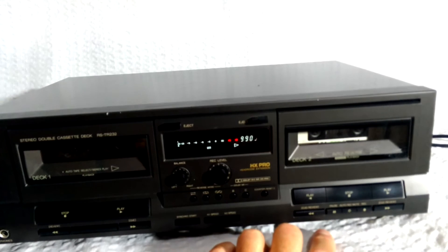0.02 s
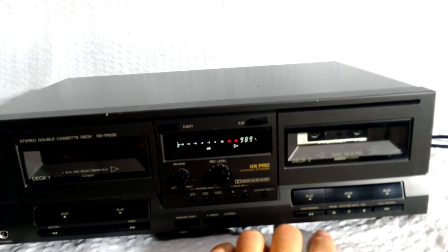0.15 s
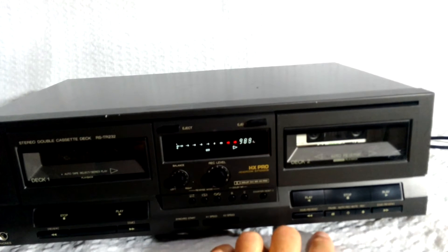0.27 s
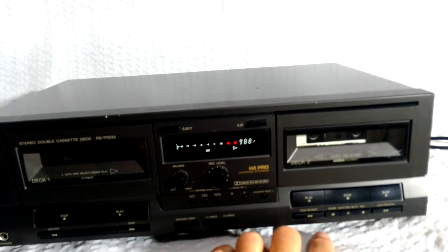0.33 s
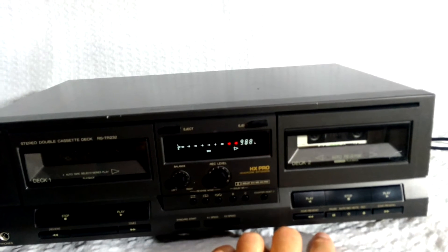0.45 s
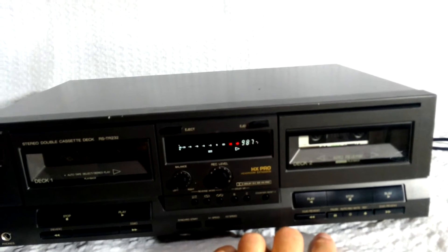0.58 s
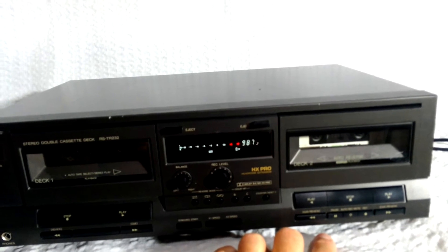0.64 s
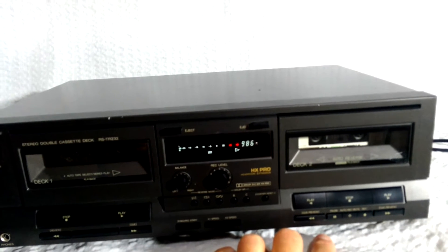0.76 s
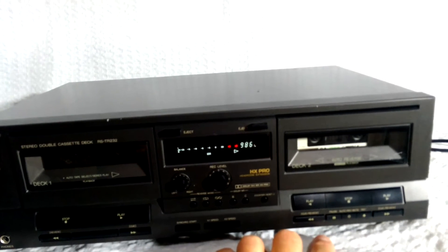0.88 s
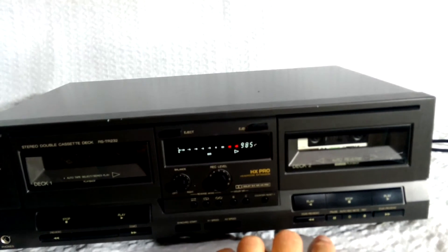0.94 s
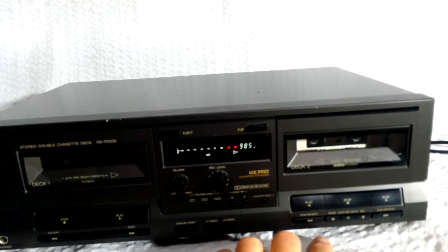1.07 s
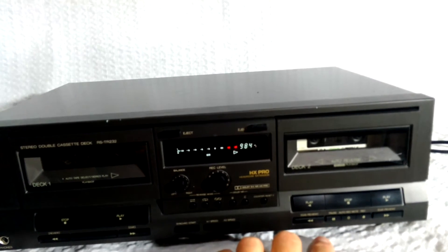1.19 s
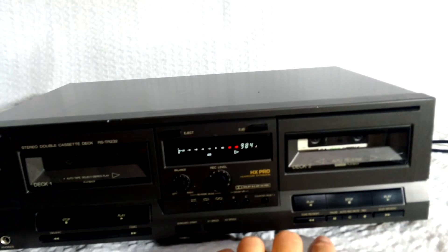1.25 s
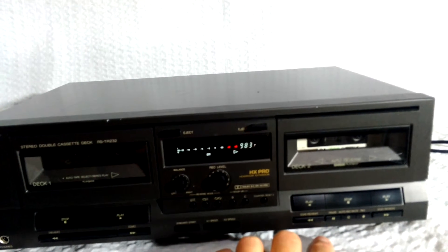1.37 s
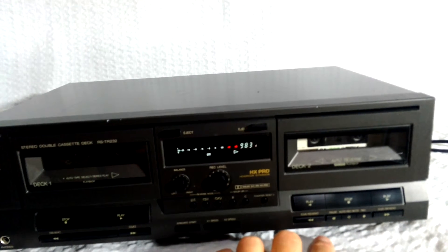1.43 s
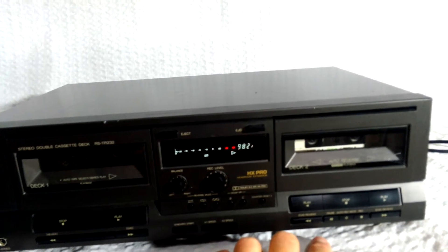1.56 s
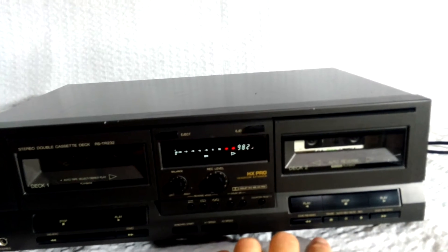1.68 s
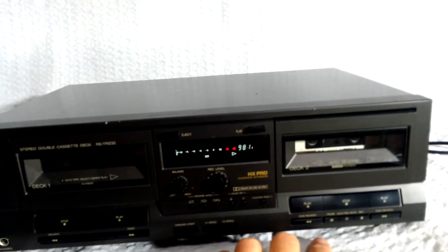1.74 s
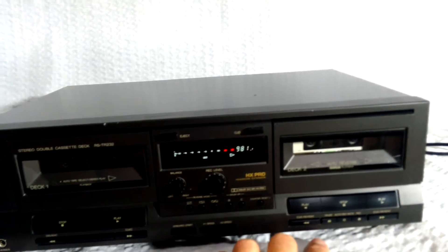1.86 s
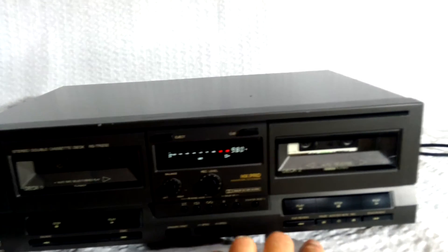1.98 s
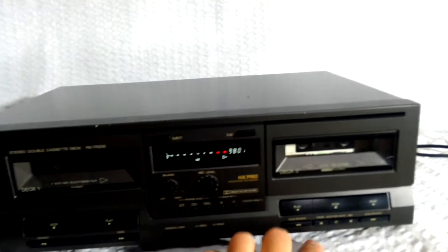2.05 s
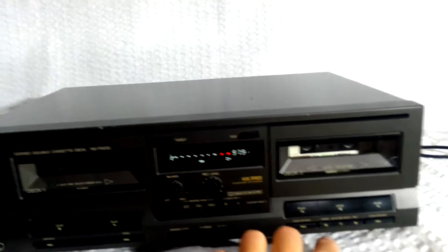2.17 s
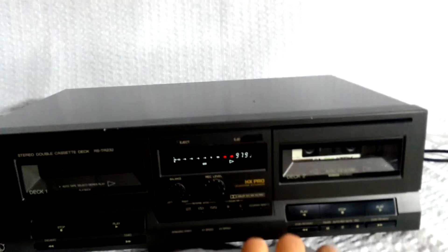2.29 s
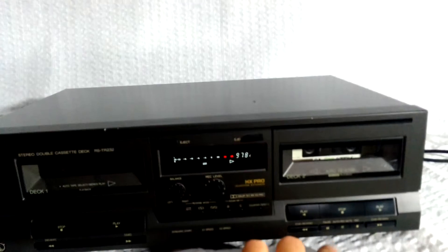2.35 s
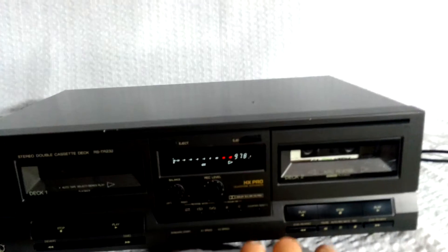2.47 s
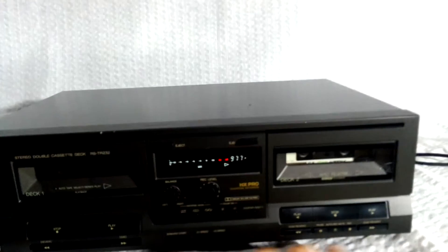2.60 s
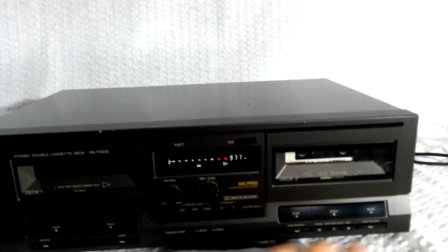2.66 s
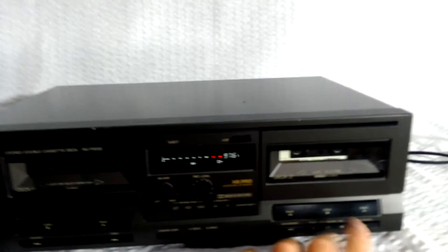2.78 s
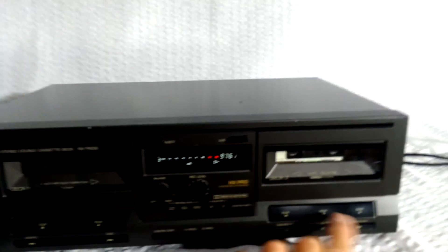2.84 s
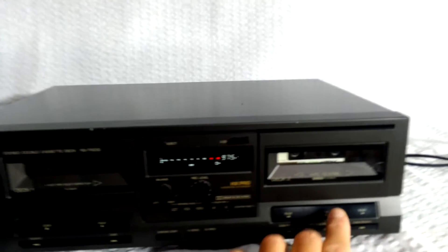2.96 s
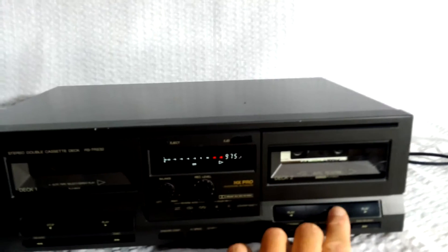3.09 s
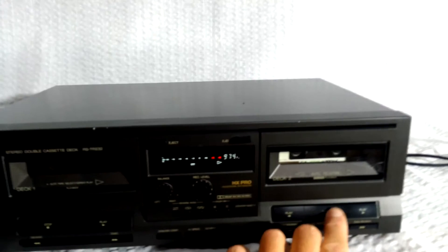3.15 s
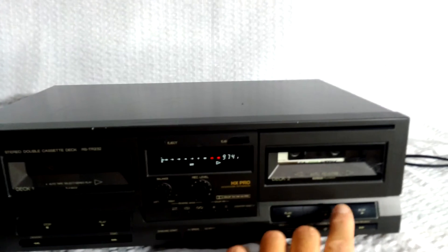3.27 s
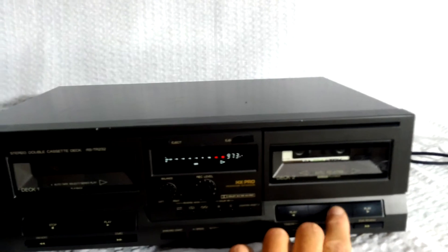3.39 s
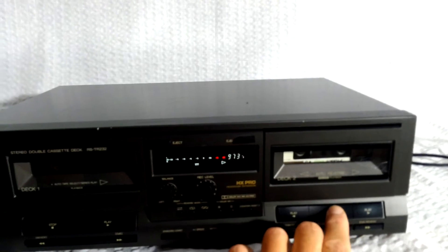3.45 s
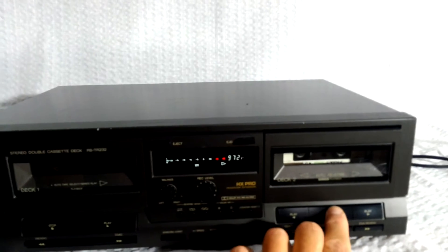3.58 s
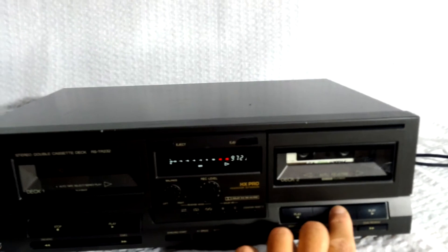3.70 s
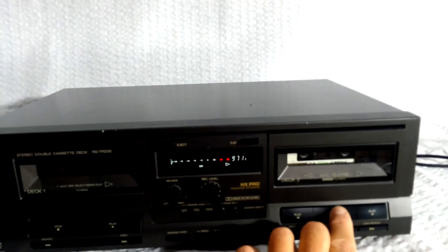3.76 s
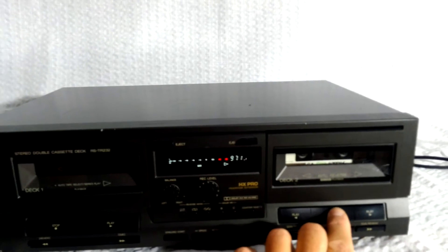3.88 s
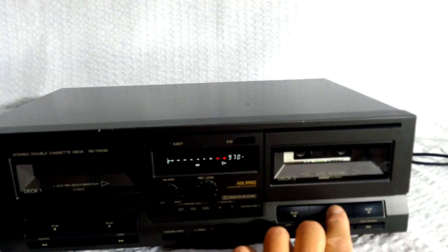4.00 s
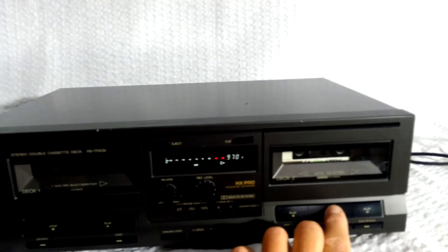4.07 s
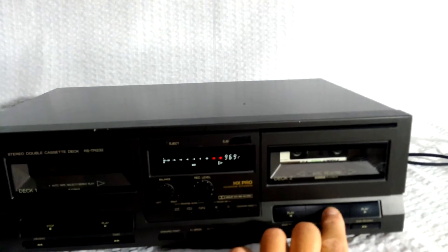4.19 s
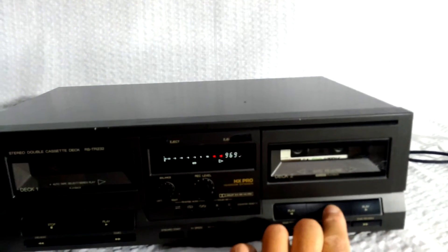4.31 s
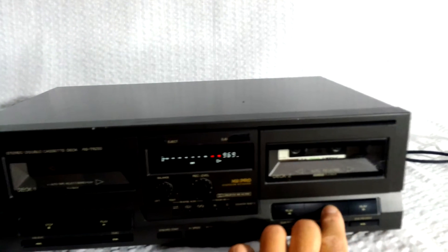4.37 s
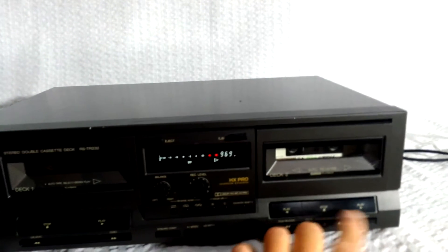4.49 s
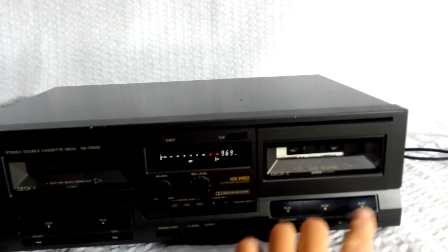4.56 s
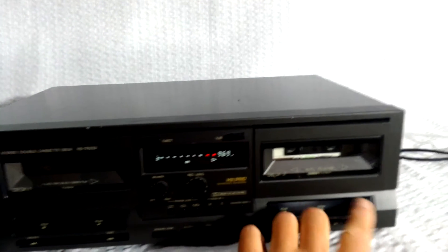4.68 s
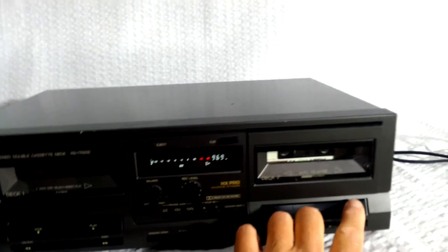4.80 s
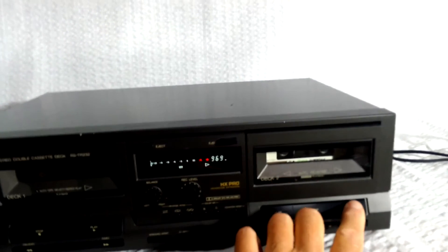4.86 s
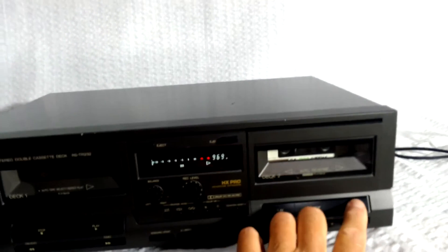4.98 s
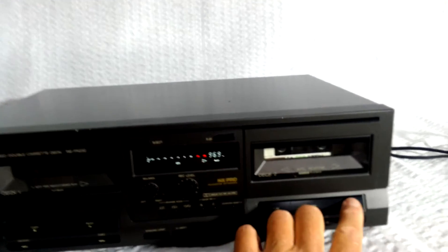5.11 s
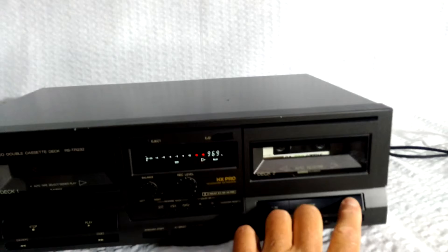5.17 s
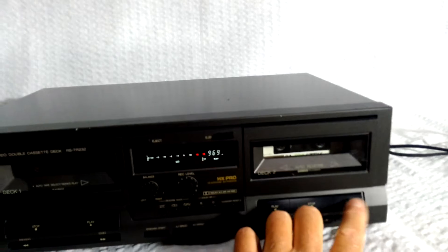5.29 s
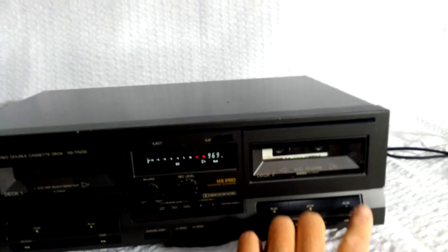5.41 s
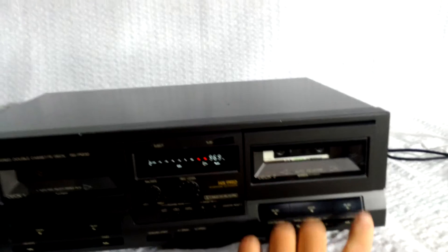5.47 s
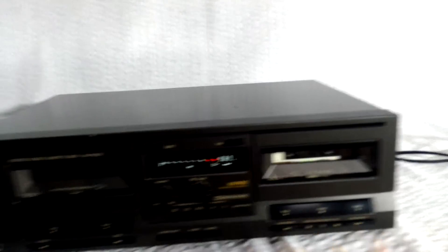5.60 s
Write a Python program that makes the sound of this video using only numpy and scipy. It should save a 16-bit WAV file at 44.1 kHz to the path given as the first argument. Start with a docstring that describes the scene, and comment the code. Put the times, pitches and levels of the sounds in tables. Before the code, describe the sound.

A cassette deck rewinds with a whirring motor and rapid rhythmic reel knocks, then stops with a ringing clunk and several key clicks.

```python
"""Cassette deck rewinding, stopped by its keys

A motor whirs as tones and coloured noise; an off-centre reel scrapes (resonated grit) and knocks once a turn.
A key clicks, the transport drops out with a clunk that rings the chassis (decaying modes), more clicks follow.
Close by in a small room with mains hum. The small microphone has a sharp treble resonance, and its
electronics add a faint whine, hiss and sizzle."""
import sys
import numpy as np
from scipy import signal
from scipy.fft import rfft, irfft
from scipy.io import wavfile

SR = 44100
rng = np.random.default_rng(int(sys.argv[2]) if len(sys.argv) > 2 else 0)


def store_wav(level_fs):
    """Save 16-bit WAV to argv[1]."""
    pcm = np.round(np.clip(np.atleast_2d(level_fs), -1, 1) * 32767)
    wavfile.write(sys.argv[1], SR, pcm.T.astype(np.int16))


N = 248724
T = np.arange(N) / SR
TURN_S = 0.13258  # one turn of the reel


def undb(db):
    """Decibels to gain."""
    return 10 ** (np.asarray(db) / 20)


def level(x, db=0):
    """Set the rms level in dB."""
    return x * undb(db) / np.sqrt(np.mean(x ** 2))


def response(points, size):
    """Gain per FFT bin of (Hz, dB) points joined on a log-frequency axis."""
    hz, db = np.transpose(points)
    bins_hz = np.fft.rfftfreq(size, 1 / SR)
    return undb(np.interp(np.log(bins_hz + 1), np.log(hz), db))


def noise(points):
    """Gaussian noise of the given colour, rms 1."""
    spectrum = rfft(rng.standard_normal(N)) * response(points, N)
    return level(irfft(spectrum, N))


def resonate(x, peaks):
    """Pass a sound through parallel (Hz, width Hz, dB) resonances."""
    out = np.zeros(N)
    for hz, width_hz, db in peaks:
        b, a = signal.iirpeak(hz, hz / width_hz, fs=SR)
        out += undb(db) * signal.lfilter(b, a, x)
    return out


def walk(rate_hz):
    """Random wander joining rate_hz knots a second, spread near 1."""
    knots = rng.standard_normal(N // 20)
    return np.interp(T * rate_hz, np.arange(len(knots)), knots)


def tones(lines, waver_hz):
    """Steady (Hz, dB rms) tones, each wandering a little in pitch."""
    out = np.zeros(N)
    for hz, db in lines:
        cycles = np.cumsum(hz + waver_hz * walk(10)) / SR + rng.random()
        out += np.sqrt(2) * undb(db) * np.sin(2 * np.pi * cycles)
    return out


def fade(age_s, t60_s):
    """Exponential decay by 60 dB in t60_s, silent before its start."""
    return (age_s >= 0) * np.exp(-np.log(1000) * np.abs(age_s) / t60_s)


def ping(age_s, hz, rise_s):
    """A tone whose envelope swells to 1 at rise_s and dies away."""
    u = np.clip(age_s / rise_s, 0, 20)
    return (u * np.exp(1 - u)) ** 2 * np.sin(2 * np.pi * hz * age_s)


def sizzle(hz, swing_hz, jitter_hz, db):
    """A thin electrical tone that flares and bends once every mains cycle."""
    mains = 2 * np.pi * 60 * T
    pitch_hz = hz + swing_hz * np.cos(mains) + jitter_hz * walk(900)
    flare = undb(8 * np.sin(mains))
    return level(flare * np.sin(2 * np.pi * np.cumsum(pitch_hz) / SR), db)


def electronics():
    """Self-noise of the microphone electronics: wavering whine tones, coloured hiss and sizzle."""
    # Each row: frequency in Hz, rms level in dB.
    whine_lines = [(5517.5, -59), (8275.5, -69.5), (11034, -70), (13792, -95)]
    # Hiss colour. Each row: frequency in Hz, relative density in dB per Hz.
    hiss_colour = [(1000, -25), (4800, -24), (5800, -10.5), (7000, -17), (9800, -17), (11000, -9),
                   (11650, -11), (12400, -5.5), (13200, -11), (15500, -19.5)]
    whine = tones(whine_lines, waver_hz=2.47)
    hiss = level(noise(hiss_colour), -64.0)
    return whine + hiss + sizzle(hz=12390, swing_hz=60, jitter_hz=91, db=-65.0)


def room():
    """Still-room noise, mains hum and the tones of the idling capstan drive."""
    # Still room. Each row: frequency in Hz, relative density in dB per Hz.
    room_colour = [(25, -34), (48, -7), (75, 1.5), (90, -3), (170, 2.5), (270, 3.5), (450, -2), (800, -5.5),
                   (1500, -12), (3000, -18.5), (5500, -15.5), (15500, -24)]
    # Mains and capstan drive. Each row: frequency in Hz, rms level in dB.
    hum_lines = [(100, -80.5), (120, -65), (139, -73), (300.5, -76), (356.5, -71.5)]
    air = noise(room_colour) * undb(-64.5 + 0.26 * walk(5.1))
    return air + tones(hum_lines, waver_hz=0.54)


def blows(table, colour, t60_s, tail_db, tail_t60_s, bright_tail_db, bright_tail_t60_s,
          ring_db, lowest_hz, rattle_wander_db):
    """Each blow bursts in body and rattle noise, rings the chassis modes and leaves a tail in the room."""
    # Chassis modes. Each row: frequency in Hz, relative level in dB, t60 in seconds.
    chassis_modes = [(322, -15, 0.48), (740, -14.5, 0.29), (1132, -4.5, 0.12), (1601, -1, 0.12),
                     (2100, -11, .18), (2205, -4, 0.071), (2720, -3, 0.062), (2950, -4, 0.052),
                     (3680, -23, .12), (4600, -2, 0.075), (4460, -1.5, 0.074), (5700, -13, 0.16),
                     (5830, -24, .2), (6101, -33, 0.18), (6940, -12, 0.12)]
    # Small parts rattling. Each row: frequency in Hz, relative density in dB per Hz.
    rattle_colour = [(2500, -27), (4200, -5), (5200, -3.5), (5800, 4), (6800, -2), (8000, -2), (11000, -5),
                     (15500, -11)]
    body_power, bright_power, strikes = np.zeros((3, N))
    for start_s, body_db, bright_db in table:
        age_s = T - start_s
        burst = fade(age_s, t60_s) ** 2
        body_tail = (undb(tail_db) * fade(age_s, tail_t60_s)) ** 2
        bright_tail = (undb(bright_tail_db) * fade(age_s, bright_tail_t60_s)) ** 2
        body_power += undb(body_db) ** 2 * (burst + body_tail)
        bright_power += undb(bright_db) ** 2 * (burst + bright_tail)
        strikes[int(start_s * SR)] += undb(body_db)

    ring_time_s = T[:SR]
    chassis = np.zeros(SR)
    for hz, db, mode_t60_s in chassis_modes:
        envelope = undb(db + ring_db) * fade(ring_time_s, mode_t60_s)
        chassis += envelope * np.sin(2 * np.pi * hz * ring_time_s)
    b, a = signal.butter(2, lowest_hz, "high", fs=SR)
    chassis = signal.lfilter(b, a, chassis)  # light parts barely stir the low modes

    unevenness = undb(rattle_wander_db * walk(600))  # slight, and none at 0 dB
    body = np.sqrt(body_power) * noise(colour)
    rattle = np.sqrt(bright_power) * unevenness * noise(rattle_colour)
    return body + rattle + signal.fftconvolve(strikes, chassis)[:N]


def latches():
    """Latches and key springs ping as they seat: short swelling tones."""
    # Each row: start in seconds, frequency in Hz, envelope peak in dB, rise in seconds.
    seatings = [(4.343, 5770, -34.5, 0.00037), (4.401, 5750, -17.5, 0.0019), (4.4080, 5900, -20.5, 0.00097),
                (4.4095, 5680, -24, 0.0013), (5.4594, 5530, -20.5, 0.00032), (5.4775, 6000, -31, 0.00058),
                (5.5393, 5380, -14.5, 0.00095), (5.5403, 6600, -17, 0.00099)]
    return sum(undb(db) * ping(T - start_s, hz, rise_s) for start_s, hz, db, rise_s in seatings)


def key_clicks():
    """Keys clicked by a finger: light blows that stir the upper chassis modes."""
    # Each row: start in seconds, body level in dB, bright rattle level in dB.
    clicks = [(4.3433, -34, -38.5), (5.1095, -41, -44), (5.2840, -50.5, -64), (5.3360, -50.5, -52),
              (5.3550, -36.5, -32), (5.3605, -36.5, -32), (5.3885, -43, -42), (5.4195, -54, -42.5),
              (5.4595, -42.5, -33), (5.4775, -38.5, -34), (5.5402, -40, -23), (5.5455, -35.5, -36),
              (5.5660, -38.5, -30.5)]
    # Clack of the keys. Each row: frequency in Hz, relative density in dB per Hz.
    clack_colour = [(40, -34), (200, -3), (450, -13.5), (1050, -1), (1450, -3.5), (2000, -1.5),
                    (3700, -2.5), (5000, -5), (7500, -26), (15500, -28)]
    return blows(clicks, clack_colour, t60_s=0.055, tail_db=-13, tail_t60_s=0.34,
                 bright_tail_db=-18.0, bright_tail_t60_s=0.32,
                 ring_db=-8.5, lowest_hz=2180, rattle_wander_db=-0.5)


def transport_stop():
    """The transport drops out: a cluster of heavy blows that ring most of the chassis."""
    # Each row: start in seconds, body level in dB, bright rattle level in dB.
    drops = [(4.3895, -47, -37.5), (4.3932, -30.5, -25), (4.4007, -28.5, -26), (4.4040, -21, -20),
             (4.4085, -31.5, -29), (4.4370, -35, -35), (4.4540, -40, -36), (4.4635, -32.5, -38)]
    # Thud of the transport. Each row: frequency in Hz, relative density in dB per Hz.
    thud_colour = [(40, -45), (130, -18), (320, -1), (510, -16.5), (730, 5), (900, 0), (1170, 1.5),
                   (1400, -9.5), (1640, 2), (2300, -1.5), (3700, -2), (5000, -1.5), (7000, -7),
                   (15500, -36)]
    return blows(drops, thud_colour, t60_s=0.052, tail_db=-15.5, tail_t60_s=0.35,
                 bright_tail_db=-24, bright_tail_t60_s=0.27,
                 ring_db=-11.0, lowest_hz=255, rattle_wander_db=0.0)


def motor_whir():
    """Motor and belt: coloured noise of slightly unsteady level under wavering tones."""
    # Motor and belt noise. Each row: frequency in Hz, relative density in dB per Hz.
    whir_colour = [(100, -3), (200, -11.5), (370, 4), (500, -20), (750, 5), (1200, -17), (1450, -1),
                   (2200, -5), (3700, -2.5), (4600, 3.5), (5600, 1.5), (7000, -0.5), (10000, -2.5),
                   (15500, -0.5)]
    # Running motor. Each row: frequency in Hz, rms level in dB.
    motor_lines = [(211, -75.5), (234, -79.5), (377, -72.5)]
    whir = noise(whir_colour) * undb(-59.0 + 0.39 * walk(40))
    return whir + tones(motor_lines, waver_hz=2.49)


def shell_grit(repeat):
    """Roughness under the reel: the share repeat of its power comes round again with every turn."""
    same = np.resize(rng.standard_normal(int(TURN_S * SR)), N)
    fresh = rng.standard_normal(N) * undb(2.1 * rng.exponential(size=N))
    share = np.clip(repeat, 0, 1)
    return np.sqrt(share) * same + np.sqrt(1 - share) * level(fresh)


def reel_pressure(age_s):
    """Reel on shell: bites shortly before the knock, drags with sagging pressure, lets go to a light rub."""
    bite_lead_s, bite_attack_s, drag_s, let_go_s = 0.055, 0.012, 0.068, 0.023
    drag_sag_db_per_s, light_rub_db = 107, -13.5
    touch_s = (age_s + bite_lead_s) % TURN_S
    attack = np.clip(touch_s / bite_attack_s, 0, 1)
    release = np.clip(1 - (touch_s - drag_s) / let_go_s, 0, 1)
    return np.hypot(attack * release * undb(-drag_sag_db_per_s * touch_s), undb(light_rub_db))


def reel_scrape(age_s):
    """Grit under the reel's pressure excites the cassette shell; it eases slowly as the tape winds on."""
    # Shell resonances. Each row: frequency in Hz, width in Hz, relative level in dB.
    shell_peaks = [(728, 44, 2), (1205, 128, 7), (1654, 86, 2.5), (2214, 370, -6), (2840, 280, -3.5),
                   (3105, 110, -9.5), (4740, 196, -2), (6040, 310, -10)]
    scrape_db, ease_db_per_s = -59.5, 0.72
    pressure = reel_pressure(age_s) * undb(2.8 * walk(70))
    scrape = level(resonate(shell_grit(repeat=0.42) * pressure, shell_peaks))
    return scrape * undb(scrape_db - ease_db_per_s * T)


def reel_knocks(turn, age_s):
    """Once a turn the shell is knocked and rebounds, the hub knocks lower, and gritty short rings tick."""
    # Short rings set off by a knock. Each row: frequency in Hz, width in Hz, relative level in dB.
    tick_peaks = [(1160, 120, 1.5), (1700, 72, 1.5), (2580, 66, 0), (3390, 410, -10.5), (4570, 230, 2.5),
                  (5930, 230, -7.5)]
    # the shell knock grows steadily as the tape winds on
    shell_knock_db, shell_growth_db_per_s = -51, 1.3
    # the hub knock builds up quickly, then eases off
    hub_knock_db, hub_loudest_s, hub_build_db_per_s, hub_ease_db_per_s = -50.5, 0.46, 28, 3.5
    tick_below_knock_db = 22.5

    shell_db = shell_knock_db + shell_growth_db_per_s * T
    hub_build_db = hub_build_db_per_s * (hub_loudest_s - T)
    hub_ease_db = hub_ease_db_per_s * (T - hub_loudest_s)
    hub_db = hub_knock_db - np.maximum(hub_build_db, hub_ease_db)

    # no two knocks are alike
    shell_chance, pitch_chance, hub_chance = rng.standard_normal((turn[-1] + 1, 3))[turn].T
    shell = ping(age_s, hz=1230 * (1 + 0.014 * pitch_chance), rise_s=0.0034)
    rebound = undb(-14) * ping(age_s - 0.012, hz=1164, rise_s=0.0053)
    hub = ping(age_s, hz=735 * (1 + 0.015 * pitch_chance), rise_s=0.0066)
    shell_knock = undb(shell_db + 0.67 * shell_chance) * (shell + rebound)
    hub_knock = undb(hub_db + 0.79 * hub_chance) * hub

    tick_grit = shell_grit(repeat=0.4) * fade(age_s - 0.002, t60_s=0.074)
    tick = level(resonate(tick_grit, tick_peaks)) * undb(shell_db - tick_below_knock_db)
    return shell_knock + hub_knock + tick


def rewind():
    """The off-centre reel scrapes and knocks once a turn over the motor, until all fade out together."""
    first_knock_s, stop_s, fade_out_s = 0.0035, 4.395, 0.044
    turns = (T - first_knock_s) / TURN_S + 1
    age_s = turns % 1 * TURN_S  # since the latest knock
    running = np.clip((stop_s - T) / fade_out_s + 1, 0, 1)
    return (reel_knocks(turns.astype(int), age_s) + reel_scrape(age_s) + motor_whir()) * running


def scene():
    """The deck and the room, in mono."""
    return (room() + latches() + key_clicks() + transport_stop() + rewind())[None]


def microphone(x, size=2048):
    """Causal minimum-phase response with the port's resonance, which rings after every click."""
    # Each row: frequency in Hz, gain in dB.
    mic_curve = [(20, -4.5), (4000, 0), (4900, 1), (5400, 7.5), (5750, 10.5), (6200, 4.5), (6800, 0.5),
                 (7500, -7), (15500, -9)]
    cepstrum = irfft(np.log(response(mic_curve, size)))
    cepstrum[1:size // 2] *= 2  # fold to minimum phase
    cepstrum[size // 2 + 1:] = 0
    impulse = irfft(np.exp(rfft(cepstrum)))
    return signal.fftconvolve(x, impulse[None])[:, :N]


def record(dry):
    """Microphone colour, the noise of its electronics, and a steep top cut."""
    top_hz = 15850
    top_cut = signal.ellip(10, 0.2, 70, top_hz, fs=SR, output="sos")  # ripple and rejection in dB
    return signal.sosfilt(top_cut, microphone(dry) + electronics())


dry = scene()
out = record(dry)
store_wav(out)
```